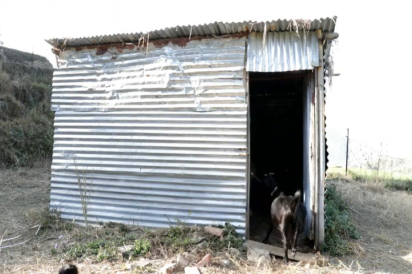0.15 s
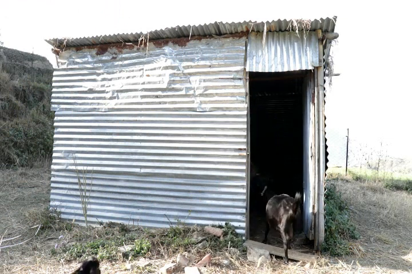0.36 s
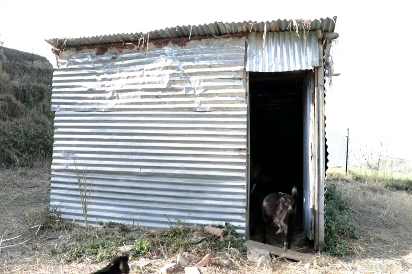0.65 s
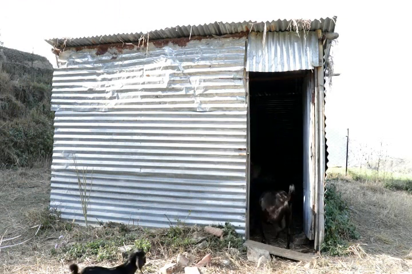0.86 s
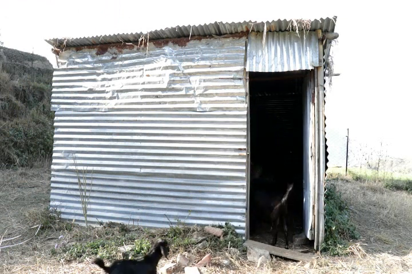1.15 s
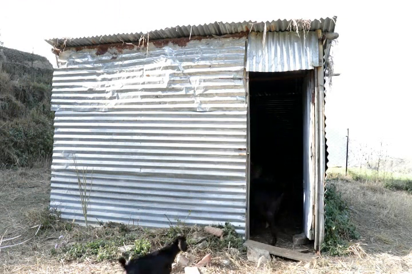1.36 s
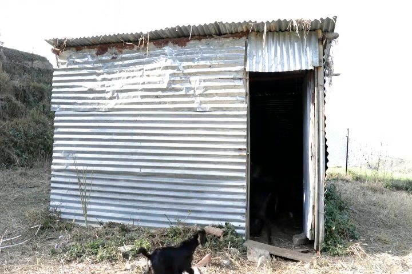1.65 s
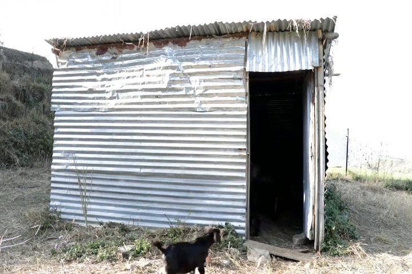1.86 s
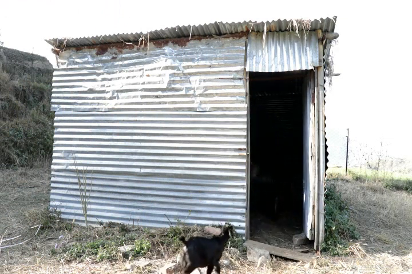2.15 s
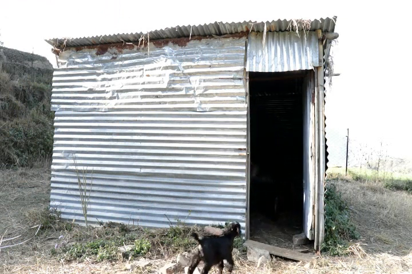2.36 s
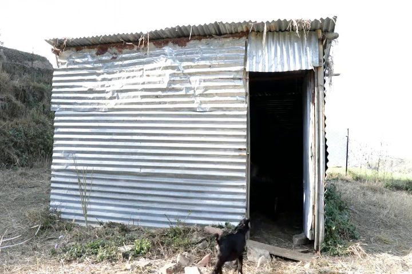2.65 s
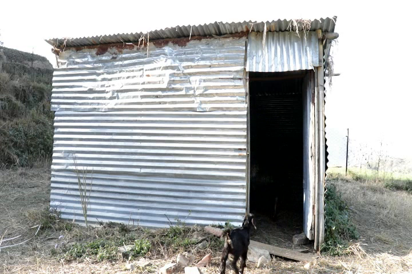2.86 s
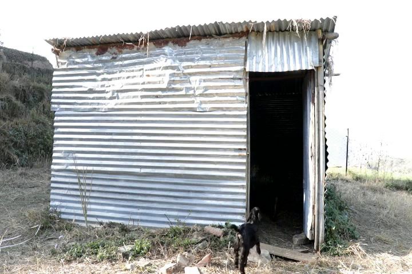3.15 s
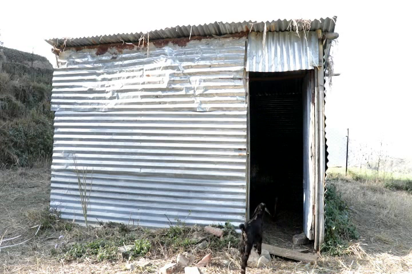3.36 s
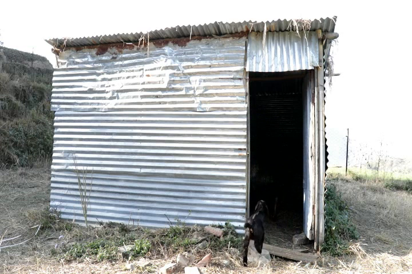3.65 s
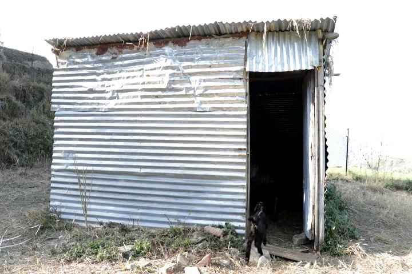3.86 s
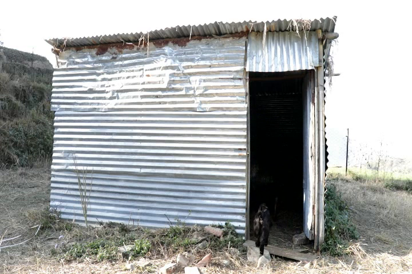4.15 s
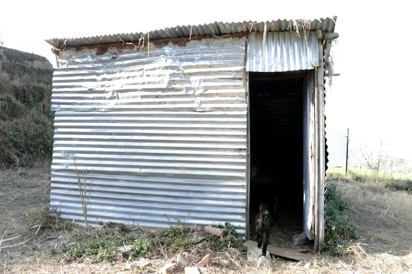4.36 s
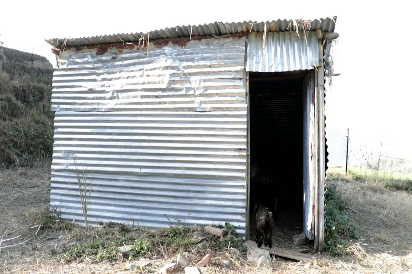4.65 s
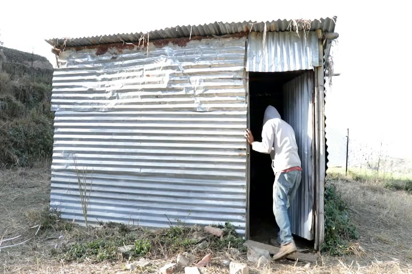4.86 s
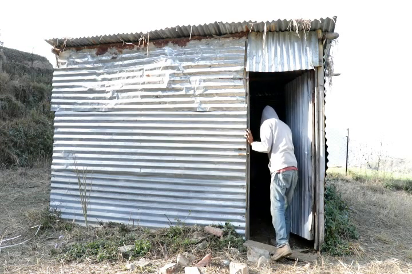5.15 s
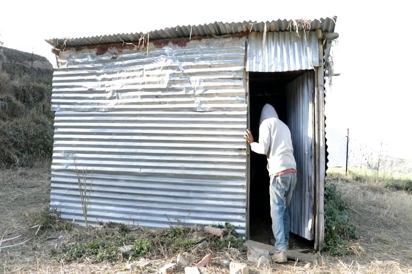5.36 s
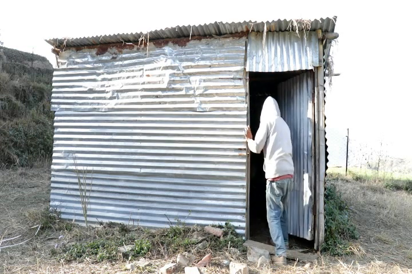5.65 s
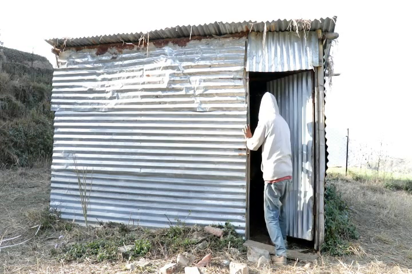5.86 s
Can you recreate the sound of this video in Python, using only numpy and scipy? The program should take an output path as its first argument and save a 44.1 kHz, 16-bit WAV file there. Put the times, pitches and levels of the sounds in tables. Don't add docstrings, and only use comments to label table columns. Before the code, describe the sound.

Outdoors by a corrugated shed, goats trot through crackling dry grass with dull hoof knocks. A short rubbed squeak comes, then one very loud metallic bang with a long bassy boom. Quieter steps, grit ticks and faint bird chirps follow, before a tin door is dragged, chattering and bumping, slams with quick rebounds and thumps on a wooden sill. Single microphone, a few metres away, quiet airy hiss.

```python
import sys
import numpy as np
from scipy import signal
from scipy.fft import rfft, irfft, next_fast_len
from scipy.io import wavfile
from scipy.ndimage import map_coordinates

SR = 44100
rng = np.random.default_rng(int(sys.argv[2]) if len(sys.argv) > 2 else 0)


def pcm_store(signal):
    levels = np.round(np.clip(np.atleast_2d(signal), -1, 1) * 32767)
    wavfile.write(sys.argv[1], SR, levels.astype(np.int16).T)


def invert_db(level):
    return 10 ** (np.asarray(level, dtype=float) / 20)


N = 265041
LAG = 0.0015

# [f/Hz, level/dB per Hz]
DOOR_COLOUR = [(59, -45), (100, -14), (146, 0.5), (233, -20), (363, -2.5), (686, -2), (746, -3.5), (865, 2),
               (1020, -2.5), (1240, 3), (2000, -4.5), (2830, -15.5), (4510, -20), (15700, -50)]
# [f/Hz, t60/s]
DOOR_DECAY = [(100, 0.88), (400, 0.9), (1200, 0.29), (2500, 0.42), (5000, 0.35), (12000, 0.14)]
# [f/Hz, level/dB, t60/s]
DOOR_PANELS = [(367, -7, 0.24), (581.3, -7, 1), (710, -4.5, 0.38), (840, -13, .4), (900, -2.5, 0.55),
               (1085, -1.5, 0.38), (1180, 1.5, 0.33), (1266, -4, 0.73), (1360, -4, 0.53), (1542, -2, 0.14),
               (1607, 2, 0.19), (1680, -3, 0.19), (1915, -8, 0.17), (2150, -5, 0.2), (2370, -7.5, 0.25),
               (2550, -5.5, 0.14), (2890, -18, 0.35), (3160, -15, 0.24), (4900, -18, 0.32)]


def unit(x):
    return x / np.sqrt(np.mean(x ** 2) + 1e-20)


def along(points, hz):
    f, v = np.transpose(points)
    return np.interp(np.log(hz + 1), np.log(f + 1), v)


def fader(points):
    s, db = np.transpose(points)
    return invert_db(np.interp(np.arange(N) / SR, s, db, left=-150, right=-150))


def wobble(rate):
    knots = rng.standard_normal(int(N * rate / SR) + 4)
    return map_coordinates(knots, [np.arange(N) * rate / SR])


def filtered(x, response):
    m = next_fast_len(N + SR // 2)
    return irfft(rfft(x, m) * response(np.fft.rfftfreq(m, 1 / SR)), m)[:N]


def coloured_noise(colour):
    return unit(filtered(rng.standard_normal(N), lambda hz: invert_db(along(colour, hz))))


def resonant(peaks):
    def response(f):
        total = 0
        for k, (centre, width, db) in enumerate(peaks):
            damping = 1j * f * width
            total = total + (-1) ** k * invert_db(db) * damping / (centre * centre - f * f + damping)
        return total
    return response


def crackle(per_s, spread_db):
    size = np.minimum(rng.exponential(size=N), 2.4)
    clicks = rng.random(N) < per_s / SR
    return unit(rng.standard_normal(N) * clicks * invert_db(spread_db * size))


def add(into, s, sound):
    part = into[round(s * SR):][:len(sound)]
    part += sound[:len(part)]


def struck(hits, colour, t60, modes, mode_db, rise, crack, lines_db, size):
    out, t = np.zeros(N), np.arange(size) / SR
    lines = lines_db * rng.standard_normal(513)
    for s, db, bass_db, treble_db, ring in hits:
        hz, frame, z = signal.stft(rng.standard_normal(size), SR, nperseg=1024, noverlap=768)
        contact_db = bass_db / (1 + (hz / 500) ** 2)
        contact_db += treble_db / (1 + (2500 / (hz + 1)) ** 2) / (1 + (hz / 15000) ** 2)
        body_db = along(colour, hz) + lines
        scale = np.sqrt(np.mean(invert_db(body_db) ** 2))
        decay_db = 60 * frame / (ring * along(t60, hz))[:, None]
        fading = invert_db((body_db + contact_db)[:, None] - decay_db)
        body = signal.istft(z * fading / scale, SR, nperseg=1024, noverlap=768)[1][:size]
        body *= 1 + crack * invert_db(-60 * t / 0.019)
        for (c, level, life), (luck, turn) in zip(modes, rng.standard_normal((len(modes), 2))):
            start_db = mode_db + level + np.interp(c, hz, contact_db) + 2.4 * luck
            body += invert_db(start_db - 60 * t / (ring * life)) * np.sin(2 * np.pi * (c * t + turn))
        add(out, s + LAG, invert_db(db) * body * (1 - np.exp(-t / rise)))
    return out


def single_modes(rows):
    out, t = np.zeros(N), np.arange(SR // 2) / SR
    for s, db, hz, t60, rise in rows:
        fade = invert_db(db - 60 * t / t60) * (1 - np.exp(-t / rise))
        add(out, s, -fade * np.cos(2 * np.pi * hz * t))
    return out


def swelling_modes(rows):
    swell = 0.088
    return single_modes([(*row, swell * row[-1] ** 2 + LAG / 2) for row in rows])


def glides(rows, bend):
    out = np.zeros(N)
    for s, length, first_hz, last_hz, db in rows:
        u = np.arange(round(length * SR)) / (length * SR)
        pitch = first_hz + (last_hz - first_hz) * u ** bend
        tone = np.sin(2 * np.pi * np.cumsum(pitch) / SR)
        add(out, s, invert_db(db) * np.sin(np.pi * u ** 0.7) ** 0.5 * tone)
    return out


def field():
    # [f/Hz, level/dB per Hz]
    air_colour = [(12, -39), (20, -2.5), (59, 6), (116, 2.5), (672, -7), (751, -7), (939, -12),
                  (1240, -9.5), (1690, -14.5), (4480, -22), (6430, -29.5), (14000, -27), (15700, -30)]
    # [t/s, level/dB]
    air_level = [(0, -50.5), (1.7, -48), (3.5, -50), (5.2, -48.5), (5.6, -44), (6.01, -48.5)]
    return invert_db(1.35 * wobble(8.8)) * fader(air_level) * coloured_noise(air_colour)


def bird():
    # [t/s, length/s, first f/Hz, last f/Hz, level/dB]
    chirps = [(2.972, 0.04, 3100, 2500, -52.5), (2.976, 0.04, 2740, 2100, -53.5),
              (3.968, 0.085, 4300, 3250, -64), (4.178, 0.082, 4800, 3700, -58),
              (4.455, 0.044, 4500, 4290, -52), (4.492, 0.0226, 4300, 3200, -53),
              (2.735, .11, 3410, 3470, -64), (2.76, .07, 3150, 3150, -64)]
    husky = glides(chirps, bend=1.1) * (0.85 + 0.4 * wobble(350))
    echo = rng.standard_normal(8000) * invert_db(-60 * np.arange(8000) / SR / 0.28)
    return husky + invert_db(2.5) * signal.fftconvolve(husky, echo / np.linalg.norm(echo))[:N]


def breeze_in_stalks():
    # [f/Hz, level/dB per Hz]
    stalk_colour = [(290, -39), (500, -39), (985, 0.5), (1090, -7.5), (1430, -11), (1590, -7), (1730, -7.5),
                    (3710, -8.5), (11300, -10.5), (15700, -13)]
    # [t/s, level/dB]
    breeze = [(0, -55.5), (.75, -59.5), (1.3, -59), (2, -58.5), (2.8, -55), (3.1, -62), (3.6, -59.5),
              (4.2, -63.5), (5, -64.5), (6.01, -68)]
    rustle = 0.72 * rng.standard_normal(N) + 0.5 * crackle(3000, 4.7) * invert_db(3.1 * wobble(67))
    rustle = unit(filtered(rustle, lambda hz: invert_db(along(stalk_colour, hz))))
    return invert_db(2.5) * fader(breeze) * rustle


def brushed_grass():
    # [t/s, length/s, level/dB]
    legs = [(0.027, 0.048, -50), (0.132, 0.052, -47), (0.28, 0.044, -50), (0.365, .055, -54),
            (0.446, 0.095, -43), (0.533, 0.093, -46.5), (0.692, 0.049, -50.5), (0.869, 0.03, -49),
            (0.925, 0.046, -48), (1.01, 0.05, -45.5), (1.11, 0.13, -54), (1.418, 0.28, -49.5),
            (2.118, 0.11, -49.5), (2.396, 0.042, -50.5), (2.501, 0.036, -49.5), (2.573, 0.22, -50.5),
            (2.784, 0.12, -50), (3.26, 0.29, -57), (3.52, 0.13, -51.5), (3.638, 0.39, -57.5),
            (4.265, 0.033, -49.5), (5.957, 0.047, -53), (5.686, 0.062, -53), (5.528, 0.052, -45)]
    # [t/s, length/s, level/dB, centre f/Hz]
    litter = (5.199, 0.05, -43, 5600)
    out = np.zeros(N)
    brushed = unit(rng.standard_normal(N) + 0.48 * crackle(1500, 2.7))
    brushed = unit(brushed * invert_db(1.5 * wobble(70)))
    for s, length, db, hz in [(*leg, 9700) for leg in legs] + [litter]:
        piece = brushed[round(s * SR):round((s + length) * SR)]
        swish = signal.lfilter(*signal.iirpeak(hz, 1.3, SR), piece)
        shape = np.sin(np.pi * np.linspace(0, 1, len(swish)) ** 0.84) ** 0.73
        add(out, s, invert_db(db + 2) * swish * shape)
    return out


def snapping_stalks():
    # [t/s, peak level/dB]
    woody = [(0.1255, -28.5), (0.4286, -32.5), (0.5609, -28.5), (1.94, -32.5), (1.9514, -35), (2.0234, -30),
             (2.2848, -30), (4.65, -37)]
    # [t/s, peak level/dB]
    fine = [(0.1592, -28), (0.1794, -36), (0.6522, -35), (0.9176, -35), (0.9687, -26.5), (1.0104, -32),
            (1.1553, -35), (2.2285, -35), (2.4004, -34), (2.5097, -35), (3.5866, -31), (4.269, -34),
            (4.277, -37)]
    out, t = np.zeros(N), np.arange(600) / SR
    fade = invert_db(-60 * t / 0.0067) + 0.29 * invert_db(-60 * t / 0.042)
    for s, db, hz in [(*snap, 5600) for snap in woody] + [(*snap, 10500) for snap in fine]:
        tick = signal.lfilter(*signal.iirpeak(hz, 1.1, SR), rng.standard_normal(600))
        add(out, s + LAG, invert_db(db - 3) * tick * fade)
    return out


def squeak():
    # [t/s, level/dB]
    pressure = [(1.1, -24), (1.125, -6), (1.16, -2.5), (1.2, 0), (1.225, -0.5), (1.27, -4), (1.32, -19),
                (1.37, -28)]
    # [top level/dB, dB per dB of pressure, lag/s]
    answers = [(-49.5, 0.9, 0.0046), (-46.5, 0.9, 0.013), (-44, 5, 0.025)]
    # [f/Hz, width/Hz, level/dB]
    thin = [(2780, 80, 6), (2930, 37, 5), (3050, 130, 4)]
    middle = [(2170, 120, -4.5), (2410, 180, -2), (2590, 92, -4), (4750, 150, -11)]
    deep = [(1190, 280, -5), (1590, 210, -1), (1920, 340, -0.5)]
    # [t/s, length/s, first f/Hz, last f/Hz, level/dB]
    strands = [(1.11, .05, 3300, 2900, -54), (1.108, .05, 2850, 2750, -51), (1.13, .065, 2300, 2400, -45.5),
               (1.165, .095, 2900, 2960, -48), (1.18, .045, 2400, 2080, -50), (1.21, .045, 1930, 1880, -43),
               (1.213, .025, 1750, 1600, -50), (1.238, .028, 1300, 1120, -47),
               (1.22, .035, 2550, 2350, -47), (1.256, .034, 2760, 2520, -53)]
    slip_count = np.floor(np.cumsum(95 / SR * invert_db(2.5 * wobble(50))))
    slips = unit(np.diff(slip_count, prepend=0) * invert_db(1.5 * wobble(71.4)))
    out = glides(strands, bend=1.0) * (0.8 + 0.45 * wobble(120))
    for (top_db, steep, lag), share, peaks in zip(answers, [0.4, 0.7, 1.5], [thin, middle, deep]):
        gain = fader([(s + lag, top_db + steep * db) for s, db in pressure])
        rub = share * slips + rng.standard_normal(N)
        out += gain * unit(filtered(filtered(rub, resonant(peaks)), resonant(peaks)))
    return out


def grit():
    # [t/s, peak level/dB]
    kicks = [(2.2852, -41.5), (3.242, -31.5), (3.2622, -41), (4.124, -37.5), (4.2694, -42.5),
             (4.5528, -40.5)]
    # [f/Hz, level/dB per Hz]
    stone_colour = [(710, -44), (1200, -14), (1370, 7), (1700, -6), (2640, 0.5), (3370, 6), (7000, -19),
                    (9100, -57), (15400, -120)]
    hits = [(s, db, 0, 0, 0.97) for s, db in kicks]
    return invert_db(-9) * struck(hits, stone_colour, [(3000, 0.21)], [], mode_db=0, rise=0.0021, crack=0.34,
                            lines_db=3, size=8000)


def hooves():
    # [t/s, peak level/dB, bass/dB]
    dirt_steps = [(0.04, -38, -1), (0.168, -33.5, 9), (0.353, -32.5, -7), (0.519, -25, -5),
                  (0.542, -37, -8), (0.568, -34, 1), (0.699, -35, -6), (0.875, -39.5, 18), (0.904, -35, -6),
                  (1.01, -34, -16), (1.431, -37.5, 14), (1.52, -35, -7), (1.61, -37.5, 6),
                  (2.229, -34.5, -5), (2.4, -33.5, -1), (2.422, -44, 10), (2.689, -35.5, 13),
                  (2.791, -34.5, 9), (3.238, -35.5, 12), (3.569, -43, 11), (4.041, -40.5, 18),
                  (4.106, -39.5, 19), (4.297, -39.5, 8)]
    # [t/s, peak level/dB, bass/dB]
    bedding_steps = [(1.474, -27.5, 1), (2.514, -32, -6), (2.573, -37, 20), (3.015, -22, -7),
                     (3.088, -30, -2)]
    # [f/Hz, level/dB per Hz]
    hoof_colour = [(47, -32), (80, -9), (212, -3.5), (346, -5.5), (650, 0.5), (1120, -4.5), (1470, -2),
                   (1600, -4), (6000, -14), (7800, -54), (13200, -120)]
    # [f/Hz, t60/s]
    hoof_decay = [(200, 0.26), (1500, 0.33), (5000, 0.29)]
    dirt_treble_db, bedding_treble_db, ring = -1, -24, 0.71
    steps = [(*step, dirt_treble_db, ring) for step in dirt_steps]
    steps += [(*step, bedding_treble_db, ring) for step in bedding_steps]
    return invert_db(-12) * struck(steps, hoof_colour, hoof_decay, [], mode_db=0, rise=0.00081, crack=0.39,
                             lines_db=3, size=6000)


def lone_rings():
    # [t/s, level/dB, f/Hz, t60/s]
    knocked = [(.508, -32.5, 203, 0.064), (.54, -34, 181, 0.055), (.566, -33.5, 196, 0.076),
               (3.045, -48, 1300, .2), (2.795, -47, 1400, .06), (2.82, -48, 1340, .2),
               (3.262, -46, 1380, .06), (.168, -42, 660, 0.065), (0.1897, -43, 478, .08),
               (.51, -43, 660, .05), (.523, -41, 950, 0.065), (.541, -40, 800, .07),
               (.568, -40, 900, 0.055), (1.5, -51, 1200, 0.19), (1.53, -50, 1200, .15),
               (1.59, -37, 220, 0.059), (4.126, -50, 4000, .12), (3.244, -45, 3300, .1),
               (3.25, -47, 2600, 0.14), (4.108, -46, 1420, 0.14), (2.248, -33, 252, 0.53),
               (2.52, -43, 242, 0.65), (.168, -38.5, 470, 0.17), (0.35, -42, 482, 0.11),
               (1.568, -32, 130, 0.14), (2.232, -44, 1720, 0.073), (2.23, -43, 1100, .05),
               (1.9, -36, 690, .05), (2.33, -43, 243, 0.33), (2.4, -40, 1170, .08),
               (2.425, -32.5, 1150, 0.054), (2.516, -45.5, 2230, 0.12), (4.297, -36.5, 498, 0.11),
               (5.548, -30.5, 125, 0.22), (5.785, -28, 190, 0.28), (5.538, -19.5, 850, 0.062),
               (3.088, -49, 1380, .12), (5.272, -35.5, 340, 0.44), (5.7755, -27.5, 514, 0.088),
               (0.23, -36, 205, 0.071), (.262, -35.5, 200, 0.072), (0.35, -39.5, 1300, 0.064),
               (5.541, -35, 4800, 0.04)]
    return swelling_modes(knocked)


def wall_cave_in():
    # [t/s, level/dB, f/Hz, t60/s, rise/s]
    pull = [
        (1.72575, 0, 700, .0025, .0001),
        (1.72575, -7, 710, .036, .0008),
    ]
    return single_modes(pull)


def wall():
    # [t/s, peak level/dB, bass/dB, treble/dB]
    bang = [
        (1.724, -4.5, 3, 0),
        (1.737, -8.5, -2.5, -2),
        (1.754, -7.5, -4.5, -12),
        (2.101, -39, 17, -30),
    ]
    # [f/Hz, level/dB per Hz]
    wall_colour = [(29, -54), (50, -32), (148, -6.5), (207, -8), (596, -3), (740, -1.5), (1090, -5),
                   (2520, -5.5), (2710, -4.5), (5070, -8), (5580, -15.5), (11200, -22), (15700, -42)]
    # [f/Hz, t60/s]
    wall_decay = [(100, 1.76), (250, 1.48), (500, 1.41), (1000, 0.68), (2000, 0.52), (4000, 0.33),
                  (10000, 0.23)]
    # [f/Hz, level/dB, t60/s]
    blow_modes = [(212, -11, 2.2), (242, -7, 1.8), (251, -9, 1.5), (291.3, -3, 1.1), (378.2, -3.5, 0.45),
                  (460, -22, 1.6), (697, -2.5, 1), (656, -5.5, 1), (720, 1.5, 0.78), (767, 2, 0.13),
                  (920, -15, 0.42), (1150, 0.5, 0.36), (1245, -16, 0.57), (1653, -8, .45), (1923, -9, 0.48),
                  (2001, -4, 0.44), (2227, -4, 0.51), (2755, 0, 0.3), (3110, -3, 0.16), (3629, -2, 0.24),
                  (4450, -7.5, 0.32)]
    # [f/Hz, level/dB, t60/s]
    slap_modes = [(1390, -11, .5), (1658, -2, .39), (2030, -9, .55), (2180, 0, .26), (2310, -9, .45),
                  (2842, -3, .26), (2982, -5, .34), (3117, -10, .42), (3413, -12, .45), (3628, -4, .26),
                  (4380, -2, .22), (4750, -7, .22), (5125, -7, .24)]
    hits = [(*hit, 0.92) for hit in bang]
    blow = struck(hits[:1], wall_colour, wall_decay, blow_modes, mode_db=-9, rise=0.0056, crack=0,
                  lines_db=2, size=50000)
    slaps = struck(hits[1:], wall_colour, wall_decay, slap_modes, mode_db=-8.5, rise=0.0015, crack=0.34,
                   lines_db=3, size=40000)
    return invert_db(-12) * (invert_db(1.5 * wobble(60)) * blow + slaps)


def door_chatter():
    # [t/s, level/dB]
    drag = [(4.72, -72), (4.8, -34.5), (4.95, -51), (5.06, -36.5), (5.3, -34), (5.5, -43.5), (5.68, -43),
            (5.8, -66), (6.01, -49.5)]
    sheet = resonant([(c, 6 / t60 + 25, db) for c, db, t60 in DOOR_PANELS])
    knocks = crackle(1200, 1.6) * invert_db(3.7 * wobble(37))
    chatter = unit(filtered(knocks, sheet)) + 1.06 * coloured_noise(DOOR_COLOUR)
    return invert_db(-8) * fader(drag) * chatter


def door_clanks():
    # [t/s, level/dB, f/Hz, t60/s]
    clanks = [(4.808, -42, 3620, 0.13), (4.83, -43, 3430, .09), (4.752, -39, 2400, .06),
              (4.775, -40, 2350, 0.076), (4.773, -33, 1100, .08), (4.812, -33, 1606, .09),
              (4.815, -32, 1200, .1), (4.86, -35, 1160, .08), (4.91, -45, 2500, .2), (4.908, -35, 1170, .1),
              (5.093, -23, 840, 0.068), (5.093, -24.5, 1204, .05), (5.104, -28, 1520, .07),
              (5.218, -26, 890, 0.11), (5.218, -27, 1248, .12), (5.256, -36, 2480, .1),
              (5.244, -26, 950, .04), (5.232, -29, 1250, .06), (4.997, -33, 1700, .08),
              (5.005, -33, 1250, .1), (5.2, -31, 1300, .06), (5.175, -34, 1500, .06), (5.58, -32, 380, .1),
              (5.61, -34, 900, .12), (5.66, -38, 700, .2), (5.34, -30, 1300, .07),
              (5.345, -32, 1760, 0.076), (5.538, -23, 1650, .04), (5.1, -39.5, 159, .3),
              (5.36, -42.5, 190, 0.28)]
    return swelling_modes(clanks)


def door_bumps():
    # [t/s, peak level/dB, bass/dB, treble/dB, ring as a factor on t60]
    contacts = [(4.728, -34, 11, 7, .6), (4.749, -28.5, 7, 10, .5), (4.771, -22, 2, -6, .4),
                (4.807, -24, -20, 2, 0.46), (4.815, -20, -20, -6, 0.47), (4.829, -24, -20, -5, .4),
                (4.858, -18.5, -18, -19, .4), (4.894, -27, -5, -15, .3), (4.906, -21, -21, -10, 0.51),
                (4.971, -33, 10, -10, .3), (4.995, -21, -4, 3, .5), (5.011, -23.5, -5, -2, .7),
                (5.092, -10, -12, -12, 0.37), (5.106, -16, -9, -14, 0.43), (5.119, -18.5, -10, -12, 0.58),
                (5.172, -16, -25, -15, 0.59), (5.197, -21, -5, 8.5, 0.55), (5.216, -15, 0.5, 8, 0.49),
                (5.23, -18.5, -5, 1, 0.38), (5.244, -16.5, -4, -10, .3), (5.258, -23, 4, 3, 0.68),
                (5.331, -17, -30, -4, .5), (5.344, -19.5, -15, -1, 0.48), (5.362, -25.5, -15, -2, .6),
                (5.403, -28.5, 9, 3, 0.57), (5.449, -33.5, -1, 4, 0.46), (5.482, -37, -5, 10, .4)]
    bumps = struck(contacts, DOOR_COLOUR, DOOR_DECAY, DOOR_PANELS, mode_db=-10.5, rise=0.0016, crack=0.2,
                   lines_db=3.5, size=15000)
    return invert_db(-9.5 + 0.62 * wobble(110)) * bumps


def door_slam():
    # [t/s, peak level/dB, bass/dB, treble/dB]
    slam = [
        (5.5377, -14, -1.5, 1.5),
        (5.552, -20, 0, 1),
        (5.579, -21, 3, -2),
        (5.612, -25.5, 0, -6),
        (5.665, -31, 2, -8),
        (5.69, -31, -5, 10),
    ]
    # [f/Hz, level/dB per Hz]
    shut_colour = [(35, -36), (60, -6), (156, -2.5), (243, -12.5), (387, -7), (895, -7), (1080, -4.5),
                   (10600, -34.5), (15700, -51)]
    # [f/Hz, level/dB, t60/s]
    shut_modes = [(97.3, -6, 0.48), (479, -10.5, 0.84), (713, -4, 0.32), (915, -6, 0.82),
                  (1007, -4.5, 0.29), (1266, -8, 0.45), (1330, -1, 0.2), (1804, -5, 0.24), (1922, -9, 0.26),
                  (2170, -7.5, 0.22), (2492, -17, 0.63), (2784, -8, 0.19), (3128, -10, 0.24),
                  (4005, -21, 0.34)]
    hits = [(*hit, 0.87) for hit in slam]
    return invert_db(-11.5) * struck(hits, shut_colour, DOOR_DECAY, shut_modes, mode_db=-8, rise=0.00053,
                               crack=0.25, lines_db=3.5, size=20000)


def sill_thump():
    # [t/s, peak level/dB]
    thumps = [
        (5.772, -25.5),
        (5.813, -29.5),
    ]
    # [f/Hz, level/dB per Hz]
    sill_colour = [(35, -49), (60, -2), (198, -5.5), (308, -11), (688, -7.5), (1040, -20), (1200, -19),
                   (3000, -35), (3900, -71), (6600, -120)]
    # [f/Hz, level/dB, t60/s]
    sill_modes = [(199.6, -5, 0.49), (370, -10.5, 0.72), (684, -13, 0.41), (915, -24, 0.46)]
    hits = [(s, db, 0, 0, 1.07) for s, db in thumps]
    return invert_db(-8) * struck(hits, sill_colour, DOOR_DECAY, sill_modes, mode_db=1.5, rise=0.001, crack=0.3,
                            lines_db=2.5, size=11000)


def scene():
    background = field() + bird()
    grass = breeze_in_stalks() + brushed_grass() + snapping_stalks()
    goats = hooves() + grit() + lone_rings() + squeak()
    bang = wall_cave_in() + wall()
    door = door_chatter() + door_clanks() + door_bumps() + door_slam() + sill_thump()
    return (background + grass + goats + bang + door)[None]


def top_cut(x):
    return signal.sosfilt(signal.butter(12, 15850, fs=SR, output="sos"), x)


def record(dry):
    limited = filtered(dry[0], lambda hz: hz < 15800)
    return top_cut(limited[None])


dry = scene()
out = record(dry)
pcm_store(out)
```